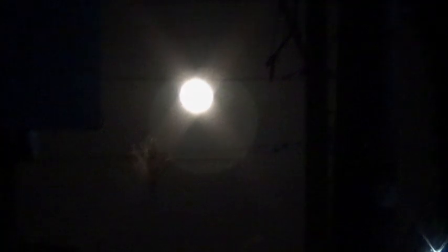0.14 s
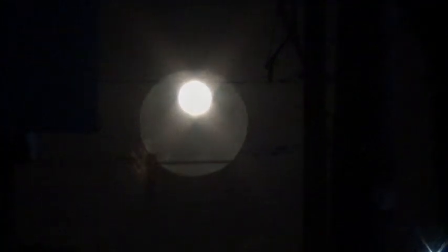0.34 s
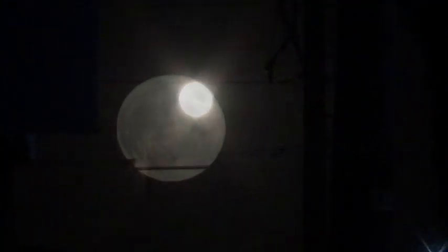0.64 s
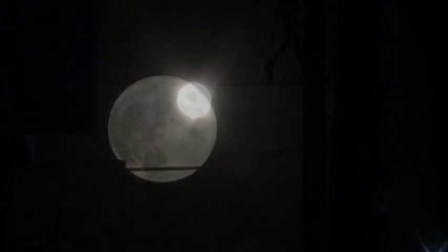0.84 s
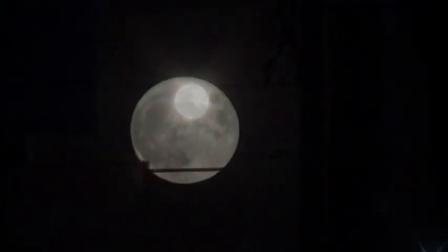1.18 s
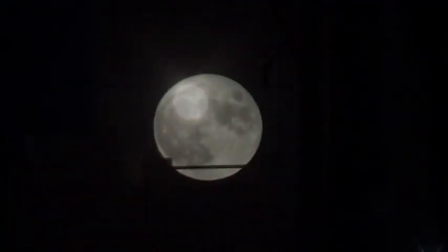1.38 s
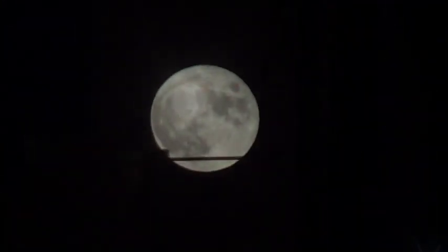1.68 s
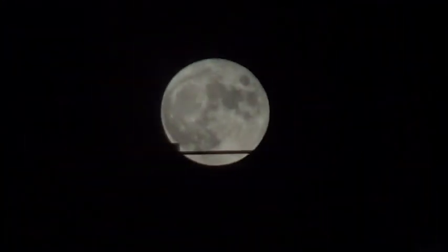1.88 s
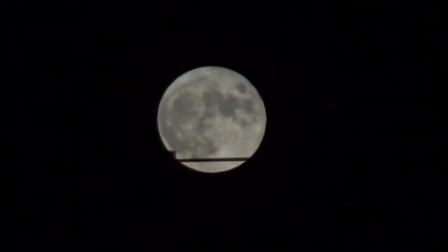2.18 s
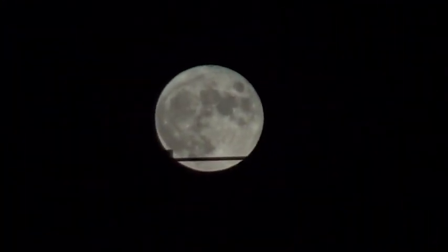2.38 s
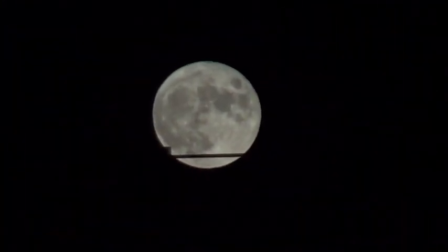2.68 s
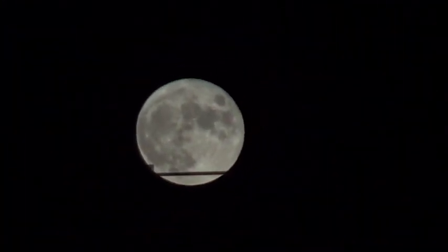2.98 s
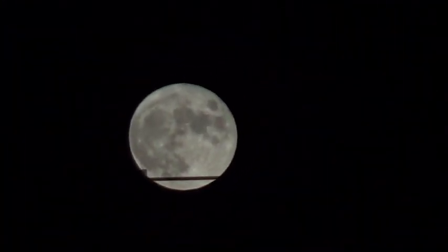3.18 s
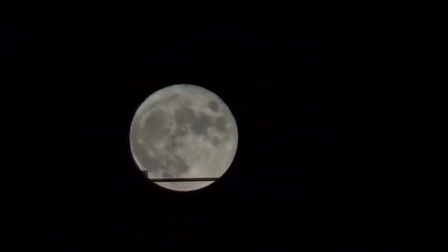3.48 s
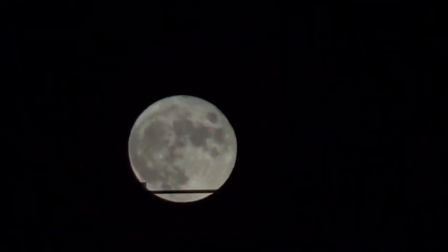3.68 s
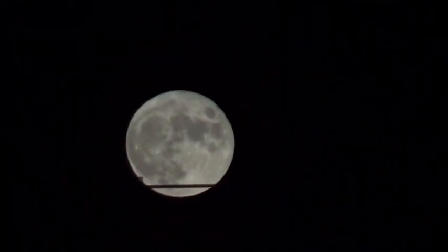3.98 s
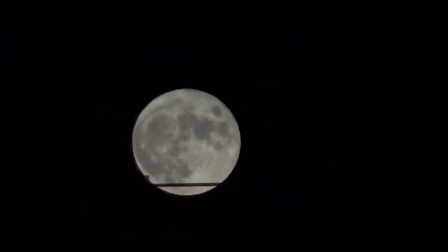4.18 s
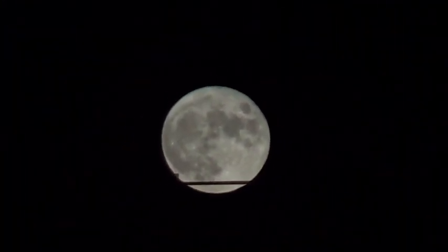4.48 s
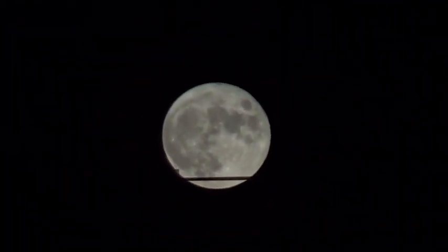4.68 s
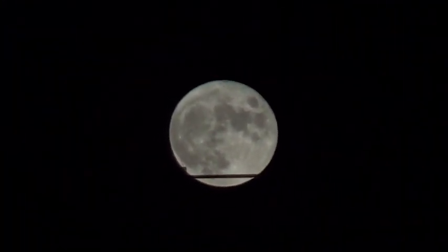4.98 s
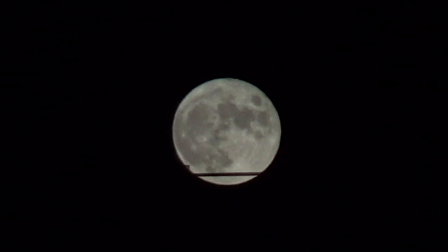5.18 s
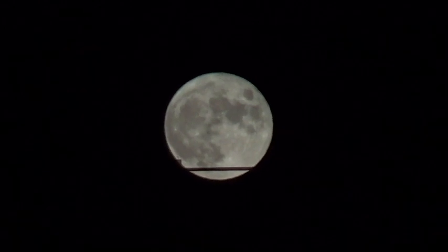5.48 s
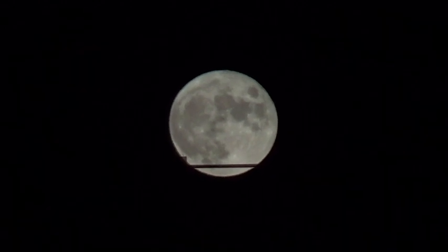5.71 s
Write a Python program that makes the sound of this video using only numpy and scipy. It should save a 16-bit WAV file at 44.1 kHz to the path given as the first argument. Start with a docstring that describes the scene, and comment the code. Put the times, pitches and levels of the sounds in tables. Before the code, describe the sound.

A still night outdoors, about six seconds, under the moon. From the start a dense chorus of crickets trills near five kilohertz, bright, shimmering and unbroken, with a far crowd blurred behind. It sinks slightly towards 1 s, then stays almost level, with tiny surges roughly each second. A slightly lower cricket trills in short runs with brief rests, clearer from 1.7 s. A thin, higher buzz swells for half a second and cuts off near 1, 2, 3, 4, 5 and 6 s, a fainter farther buzz ahead of it. Very faint low chirps and an airy sheen of higher insects lie around. A soft low rush fades in the first second or so, leaving quiet air and distant rumble swelling gently. Small dry camera clicks fall at 0.36, 0.6, 1.2 and 1.38 s, the last with a dull knock, then faintly at 2.45 and 5 s.

```python
"""Crickets on a still night: several trill near 5 kHz over a far chorus, by stridulation, each wing stroke
a short tone of falling pitch. One buzzes in crescendos about once a second, with a farther buzzer ahead of it;
a low one chirps far off, and higher insects add a sheen of narrow-band noise. Filtered noise makes the night
air, a fading rush and a distant rumble like traffic that swells softly. The hand-held camera clicks a few
times: noise bursts and decaying modes."""
import sys
import numpy as np
from scipy import signal
from scipy.fft import rfft, irfft
from scipy.io import wavfile
from scipy.ndimage import uniform_filter1d

SR = 44100
rng = np.random.default_rng(int(sys.argv[2]) if len(sys.argv) > 2 else 0)


def persist_wave(psi):
    """Save psi, clipped to +-1, as 16-bit WAV."""
    counts = np.round(np.clip(psi, -1, 1) * 32767).astype(np.int16)
    wavfile.write(sys.argv[1], SR, np.atleast_2d(counts).T)


N = 257973
T = np.arange(N) / SR  # time [s]
HZ = np.fft.rfftfreq(N, 1 / SR)  # frequency of each spectral line [Hz]

# slow loudness contour of the main chorus, to which its singers add their own trims: t/s, relative level/dB
CHORUS_LEVEL = [(0.1, -31.5), (0.99, -35.5), (2.03, -34), (2.19, -32), (2.29, -33.5), (5.75, -32.5)]


def chorus(trim_db=0.24):
    """Incoherent superposition: steady trillers and a far crowd share one amplitude modulation."""
    # crickets that never stop: mid-stroke pitch f/Hz, fall within a stroke/Hz, strokes per s,
    # sounding share of a stroke, relative level/dB, echo level on the direct sound/dB
    trillers = [(5177, 50.5, 20, 0.92, -10, 4), (5208, 330, 103.2, 0.94, -7.5, 7),
                (5327, 230, 29.9, 0.94, -10.5, 2), (5136, 220, 118.6, 0.99, -9.5, -3.5),
                (5200, 260, 79.4, 1, -9.5, 9), (5025, 200, 34, .9, -10.5, 4.5),
                (4894, 130, 44.2, .9, -15.5, 6), (4710, 150, 66, 0.74, -29, -17),
                (5512, 120, 33.2, 0.85, -13.5, 6)]
    # countless far crickets blur into bands: f/Hz, width/Hz, relative density level/dB
    crowd_bands = [(3720, 500, -29), (3870, 51, -20), (4690, 180, -11.5), (5174, 213, 2.5)]
    # brief surges: middle t/s, rise in level/dB
    surge_rows = [(1.22, 1), (2.2, 1.5), (3.09, 2.5), (4.01, 1.5), (5.11, 1.5)]
    surge_width_s, crowd_db = 0.035, -6.5
    flutter_db, flutter_per_s = 0.5, 8  # a small random flutter of level

    near = np.zeros(N)
    for hz, fall_hz, per_s, share, db, echo_db in trillers:
        song = strokes(beat(per_s), hz, fall_hz, share)
        near += amp(db) * garden(song, echo_db)
    crowd = amp(crowd_db) * noise(bands(crowd_bands))
    surges = sum(db * bell(s, surge_width_s) for s, db in surge_rows)
    flutter = flutter_db * drift(flutter_per_s)
    return steadied(evened(near) + crowd) * amp(trim_db + curve(CHORUS_LEVEL) + surges + flutter)


def deep_cricket():
    """Frequency-swept strokes: the pitch slides far down, and each run restarts the beat after a rest."""
    # trill runs: start t/s, level on the chorus contour/dB
    runs = [(-0.006, -29), (0.841, -26), (1.661, -20), (2.073, -19), (2.478, -18.5), (2.896, -20),
            (3.379, -18), (3.811, -21), (4.254, -20.5), (4.646, -19), (5.047, -18.5), (5.612, -20)]
    strokes_per_s, rest_s = 32.35, 0.11
    turns = np.zeros(N)  # running stroke count; zero during the rests, which keeps them silent
    ends = [start - rest_s for start, _ in runs[1:]] + [np.inf]
    for (start, _), end in zip(runs, ends):
        singing = (T >= start) & (T < end)
        run_turns = np.ceil(turns.max()) + (T - start) * strokes_per_s
        turns = np.where(singing, run_turns, turns)
    song = strokes(turns, hz=4670, fall_hz=640, share=0.37, uneven_db=0.5)
    return amp(curve(CHORUS_LEVEL) + curve(runs)) * garden(song, echo_db=-22)


def buzzers():
    """Superposition of two staggered sources: each farther crescendo ends before the near one."""
    # crescendos: end of the near one t/s, final near level/dB, final far level/dB
    crescendos = [(0.939, -48, -51.5), (1.968, -41.5, -50), (2.96, -40.5, -45.5), (3.961, -40, -45.5),
                  (4.982, -40.5, -49), (5.95, -39.5, -62)]
    far_lead_s = 0.28
    near_rows = [(end, db) for end, db, _ in crescendos]
    far_rows = [(end - far_lead_s, db) for end, _, db in crescendos]
    near = buzzer(near_rows, length_s=0.52, hz=6510, fall_hz=600, echo_db=-15, stop_s=0.0066)
    far = buzzer(far_rows, length_s=0.58, hz=6470, fall_hz=1310, echo_db=-5, stop_s=0.33)
    return near + far


def buzzer(rows, length_s, hz, fall_hz, echo_db, stop_s, rise_db=18):
    """Growing stridulation force: the wings press harder and in the end beat slower, then stop."""
    level, per_s = np.zeros(N), np.full(N, 150.0)
    for end, db in rows:
        start = end - length_s
        along = np.clip((T - start) / length_s, 0, 1)
        level += gate(start, end, stop_s) * amp(db - rise_db * (1 - along) ** 2)
        # strokes per second at points along the crescendo
        slowing = np.interp(along, [0, 0.3, 0.6, 1], [148.7, 150.9, 140.4, 131.2])
        per_s = np.where(T > start, slowing, per_s)
    song = strokes(beat(per_s), hz, fall_hz, share=0.9, uneven_db=1.0, scatter_hz=14.6, second_db=-21.5)
    return garden(song * level, echo_db, t60=0.15)


def high_insects():
    """Random superposition: one small high triller over far ones that merge into narrow-band noise."""
    # levels before the trims below: t/s, level of triller and sheen/dB, level of the finest hiss/dB
    insect_levels = [(0.0, -51, -67), (0.85, -55, -67), (2.18, -51.5, -61), (5.75, -51.5, -60.5)]
    # far insects blurred into a sheen: f/Hz, width/Hz, relative density level/dB
    sheen_bands = [(5770, 530, -3), (6200, 96, 5.5), (7110, 260, 1), (7760, 300, -3.5), (7960, 55, 1.5),
                   (8265, 160, -0.5), (9500, 510, -10), (10380, 190, -3.5), (11050, 100, -11.5),
                   (13050, 400, -14.5)]
    # finest hiss: f/Hz, width/Hz, relative density level/dB
    hiss_bands = [(13200, 1500, -13), (15240, 400, -2), (15700, 250, -2)]
    song = strokes(beat(34.4), hz=8210, fall_hz=344.3, share=0.37)
    small = amp(-8.5) * steadied(garden(song, echo_db=0))
    sheen = amp(2.5) * noise(bands(sheen_bands))
    hiss = amp(3.0) * noise(bands(hiss_bands))
    return (small + sheen) * amp(curve(insect_levels, axis=1)) + hiss * amp(curve(insect_levels, axis=2))


def far_crickets():
    """Reverberant blurring by distance: low chirps, thin long trills and a single peep."""
    # long faint trills: start t/s, end t/s
    faint_trills = [(1.72, 2.42), (3.22, 3.947), (4.88, 5.1)]
    # one faint far peep: middle t/s, f/Hz
    peep_s, peep_hz = (1.525, 1700)
    # the chirps keep a steady beat and grow clearer over the first seconds
    first_chirp_s, chirp_every_s, chirp_width_s = 0.1, 0.282, 0.071
    grow_s, envelope_db = 1.9, [-71, -56.5]  # before the weights of core and rasp
    chirps = sum(bell(s, chirp_width_s) for s in np.arange(first_chirp_s, T[-1], chirp_every_s))
    chirps = chirps * amp(np.interp(T, [0, grow_s], envelope_db))
    # each chirp is a clear core with a rasp around it
    core = steadied(garden(strokes(beat(55), hz=3532, fall_hz=199.8, share=0.84), echo_db=14))
    rasp = noise(bands([(3440, 195, 0)]))
    low = chirps * (amp(-4.5) * core + amp(-6.5) * rasp)

    trill = steadied(garden(strokes(beat(48), hz=4160, fall_hz=197.4, share=0.95), echo_db=5))
    thin = amp(-62.5) * sum(gate(start, end, 0.21) for start, end in faint_trills) * trill
    peep_tone = steadied(noise(bands([(peep_hz, 25, 0)])))
    peep = amp(-61) * bell(peep_s, width=0.043) * peep_tone
    return low + thin + peep


def clicks(crack_db=-4, crack_s=0.0059):
    """Impulsive excitation by fingers on the camera: a short crack, a bright ring and a dull knock."""
    # clicks: t/s, level/dB, dull knock relative to the click/dB
    click_rows = [(.3565, -32.5, -16), (.3585, -40, -12), (0.588, -43.5, -18), (1.223, -47, -18),
                  (1.376, -35, -6.5), (1.3805, -43.5, 8.5), (2.45, -45, -28), (4.986, -45, -26)]
    # bright modes of the case: f/Hz, t60/s, relative level/dB
    case_modes = [(1660, 0.03, -5), (2230, 0.0041, 4.5), (2750, 0.0056, -4), (3235, 0.022, -3),
                  (3530, 0.016, -5.5), (4160, 0.016, 0)]
    # dull modes of the knock: f/Hz, t60/s, relative level/dB
    thud_modes = [(148, 0.05, -0.5), (433, 0.015, -0.5), (760, 0.011, 4.5), (1204, 0.047, 1),
                  (2480, 0.025, -5)]
    t, out = T[:SR // 10], np.zeros(N)
    for s, db, thud_db in click_rows:
        crack = amp(crack_db) * rng.standard_normal(len(t)) * np.exp(-t / crack_s)
        click = crack + ring(case_modes, t) + amp(thud_db) * ring(thud_modes, t)
        out[round(s * SR):][:len(t)] += amp(db) * click
    return out


def distance(whine_trim_db=-2):
    """Spectrally shaped noise: steady air, a fading rush, and the rumble and faint whine of far traffic."""
    # night air: f/Hz, relative density level/dB
    air_points = [(20, -18), (45, -4.5), (65, -2), (120, 1.5), (300, -1.5), (480, -6.5), (720, -5.5),
                  (900, -6.5), (1280, -8), (1400, -12), (2500, -17), (4500, -20.5), (12000, -23),
                  (16000, -41)]
    # broad rush: f/Hz, relative density level/dB
    rush_points = [(20, -14), (65, -0.5), (200, -0.5), (700, -3), (1150, -4.5), (1500, -12), (2500, -22),
                   (6000, -24), (16000, -38)]
    # rumble bands: f/Hz, width/Hz, relative density level/dB
    rumble_bands = [(99.2, 2.3, -1.5), (176.6, 27, -1), (235, 31, -3)]
    # soft swells of the rumble: middle t/s, half width/s, level/dB
    swells = [(.2, 0.087, -50), (1.5, .07, -55), (2.22, .09, -54), (2.5, 0.09, -51.5), (4.03, .07, -54),
              (4.32, 0.1, -48.5), (5.02, 0.043, -51), (5.4, 0.32, -52)]
    # whine bands: f/Hz, width/Hz, relative density level/dB
    whine_bands = [(1032, 28, -3.5), (1264, 8.7, -4.5)]
    # whine contour before its trim: t/s, level/dB
    whine_level = [(1.45, -57), (1.95, -54), (3.32, -60), (3.42, -53), (4.03, -57), (4.27, -51.5),
                   (5.75, -60), (5.8, -58)]
    rush_db, rush_fall_db_per_s = -43, 12.5
    rumble_db = -59  # between swells

    air = amp(-50.5) * noise(spectrum(air_points))
    rush = amp(rush_db - rush_fall_db_per_s * T) * noise(spectrum(rush_points))
    # powers add, not amplitudes
    power = amp(rumble_db) ** 2 + sum((amp(db) * bell(s, width)) ** 2 for s, width, db in swells)
    rumble = np.sqrt(power) * noise(bands(rumble_bands))
    whine = amp(whine_trim_db + curve(whine_level)) * noise(bands(whine_bands))
    return air + rush + rumble + whine


def strokes(turns, hz, fall_hz, share, uneven_db=1.3, scatter_hz=12, second_db=-38):
    """Stridulation: a scraper runs along the wing file; each tone swells, sinks in pitch and stops."""
    stroke = turns.astype(int)
    # every stroke has its own random force, pitch and starting phase
    force, detune, start = rng.standard_normal((2048, 3))[stroke].T
    along = np.minimum(turns % 1 / np.clip(share, 0.1, 1), 1)
    pitch = hz + fall_hz * (0.5 - along) + scatter_hz * detune
    phase = 2 * np.pi * (np.cumsum(pitch) / SR + start)
    tone = np.sin(phase) + amp(second_db) * np.sin(2 * phase)
    swell = abs(np.sin(np.pi * along)) ** 1.5
    return evened(tone * swell * amp(uneven_db * force))


def beat(per_s):
    """Phase accumulation: running count of wing strokes at a nearly steady rate."""
    return np.cumsum(per_s * (1 + 0.004 * drift(2))) / SR + rng.random()


def garden(x, echo_db, t60=0.23):
    """Multipath: reflections shift in pattern as the microphone sways; the total power is unchanged."""
    sway = np.pi * T + drift(0.98)
    # sine and cosine weights keep the power while one echo pattern turns into the other
    echo = np.cos(sway) * scatter(x, t60) + np.sin(sway) * scatter(x, t60)
    return evened(x + amp(echo_db) * echo) * np.std(x)


def scatter(x, t60):
    """Diffuse reflection: ground, walls and leaves return a short, sparse, decaying tail."""
    t = T[:SR // 2]
    present = rng.random(len(t)) < 2000 / SR  # about 2000 reflections per second
    taps = rng.standard_normal(len(t)) * present * amp(-60 * t / t60)
    return signal.oaconvolve(x, taps / np.linalg.norm(taps))[:N]


def ring(modes, t):
    """Modal decay of a tapped body: dying sines, neighbouring modes in opposite polarity."""
    return sum((-1) ** k * amp(db - 60 * t / t60) * np.sin(2 * np.pi * hz * t)
               for k, (hz, t60, db) in enumerate(modes))


def noise(gain):
    """Spectral shaping: white noise filtered by a gain, scaled to rms 1."""
    return evened(irfft(rfft(rng.standard_normal(N)) * gain, N))


def bands(rows):
    """Power addition: gain at every frequency from bell-shaped bands."""
    return np.sqrt(sum(amp(db) ** 2 * np.exp(-0.5 * ((HZ - hz) / width) ** 2) for hz, width, db in rows))


def spectrum(points):
    """Logarithmic interpolation: gain at every frequency from (Hz, dB) points."""
    hz, db = np.transpose(points)
    return amp(np.interp(np.log(HZ + 1), np.log(hz), db))


def drift(per_s):
    """Low-frequency random modulation: straight lines between random knots, rms 1."""
    knots = rng.standard_normal(1024)
    return evened(np.interp(T * 2 * per_s, np.arange(len(knots)), knots))


def steadied(x, size=3500):
    """Envelope normalization: holds the slow level at rms 1 and leaves the fast beating."""
    power = uniform_filter1d(uniform_filter1d(x ** 2, size), size)
    return x / np.sqrt(abs(power) + 1e-12)


def evened(x):
    """Power normalization: scales to rms 1."""
    return x / np.sqrt(np.mean(x ** 2) + 1e-20)


def curve(rows, axis=1):
    """Linear interpolation: one column of a time table at every sample."""
    rows = np.asarray(rows)
    return np.interp(T, rows[:, 0], rows[:, axis])


def gate(start, end, edge):
    """Time windowing: one between two times, with sloping edges."""
    return np.clip(np.minimum(T - start, end - T) / edge + 0.5, 0, 1)


def bell(middle, width):
    """Gaussian envelope: a smooth rise and fall of height one."""
    return np.exp(-0.5 * ((T - middle) / width) ** 2)


def amp(db):
    """Logarithmic level scale: decibels to amplitude gain."""
    return 10 ** (np.asarray(db) / 20)


def scene():
    """Mid-side stereo: two close microphones hear almost the same; scattered sound adds a little width."""
    # side gain on the scattered sound: f/Hz, level/dB
    side_gain = [(30, -39), (125, -19), (500, -19.5), (1000, -9), (2000, -47), (5000, -17), (8000, -15),
                 (12000, -33)]
    night = chorus() + deep_cricket() + buzzers() + high_insects() + far_crickets() + distance()
    side = irfft(rfft(scatter(night, t60=0.41)) * spectrum(side_gain), N)
    mid = night + clicks()
    return np.array([mid + side, mid - side])


def record(dry):
    """Band limitation: the recorder's linear-phase low-pass filter."""
    edge_hz = 15750
    lowpass = signal.firwin(511, edge_hz, window=("kaiser", 9), fs=SR)
    return signal.oaconvolve(dry, lowpass[None], "same")


dry = scene()
out = record(dry)
persist_wave(out)
```